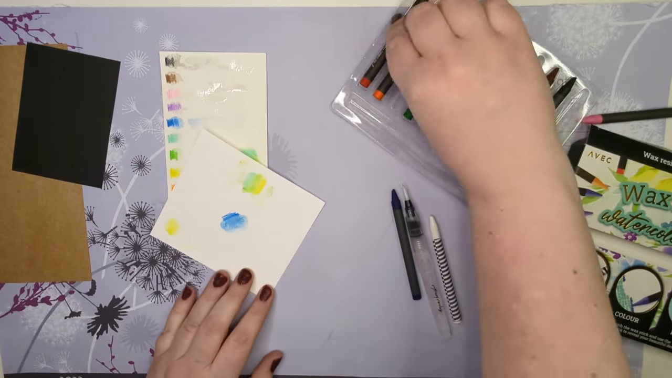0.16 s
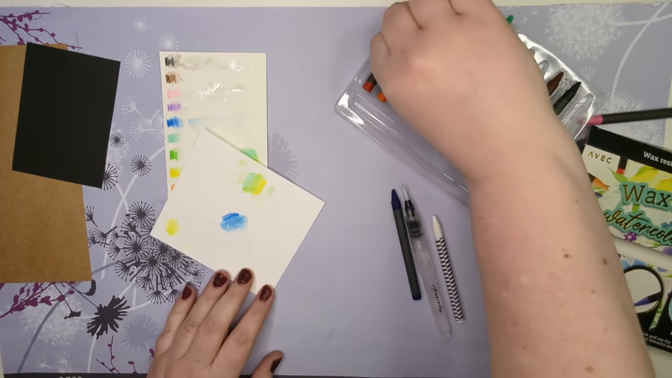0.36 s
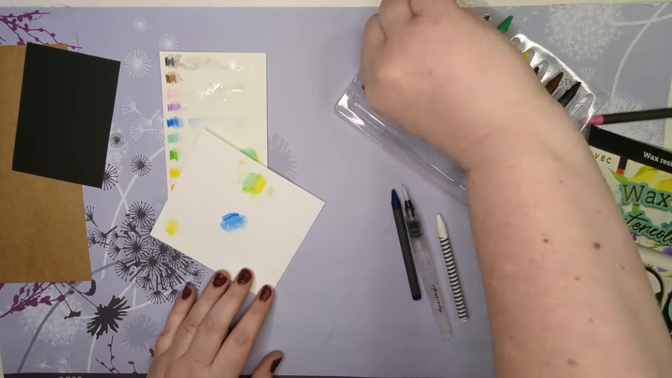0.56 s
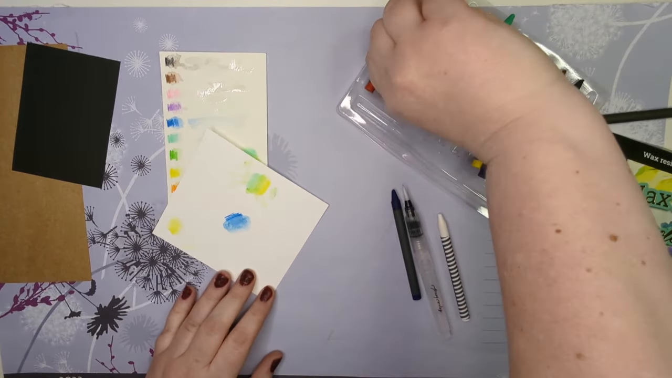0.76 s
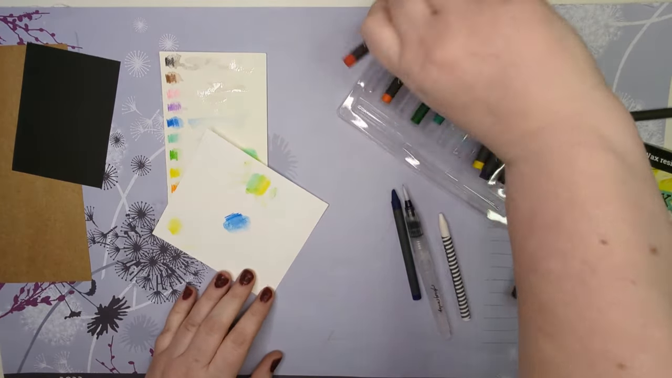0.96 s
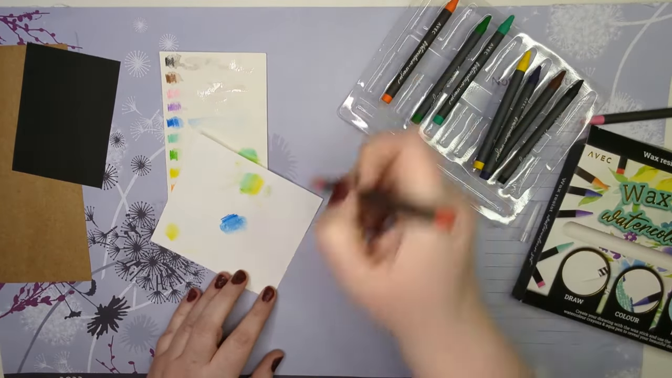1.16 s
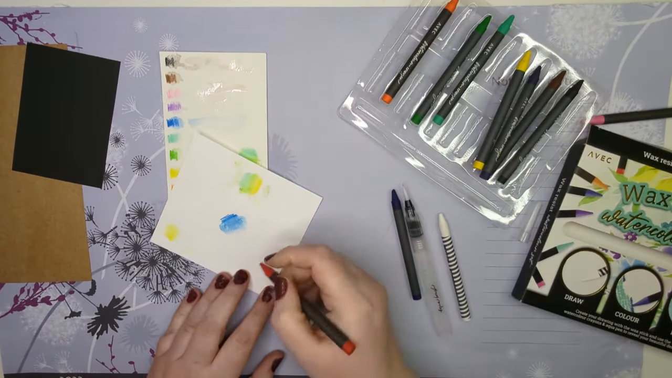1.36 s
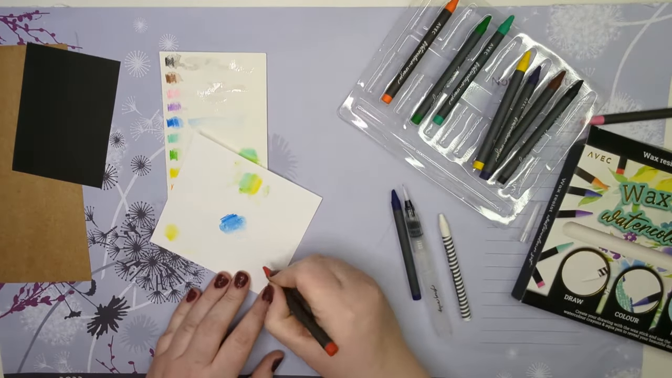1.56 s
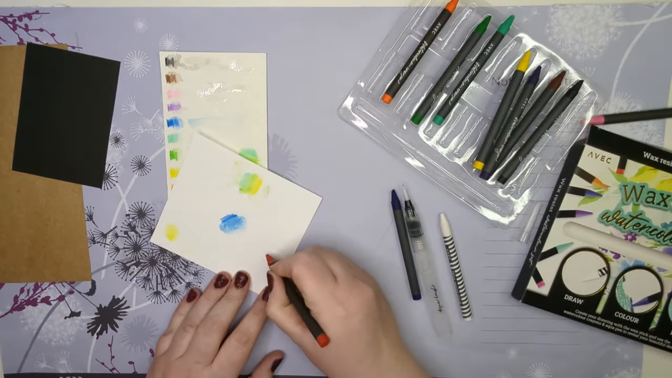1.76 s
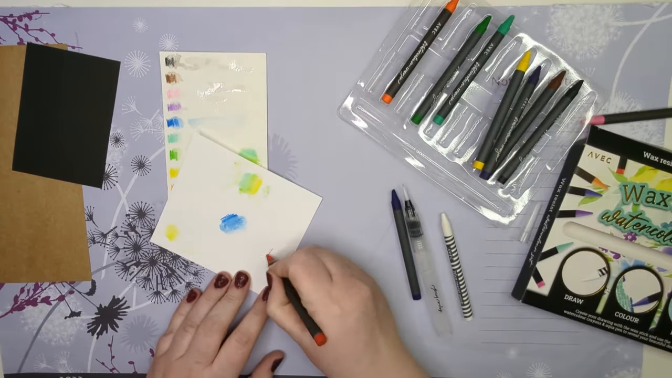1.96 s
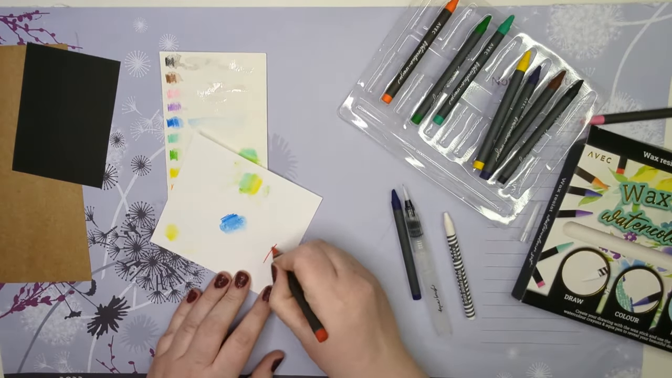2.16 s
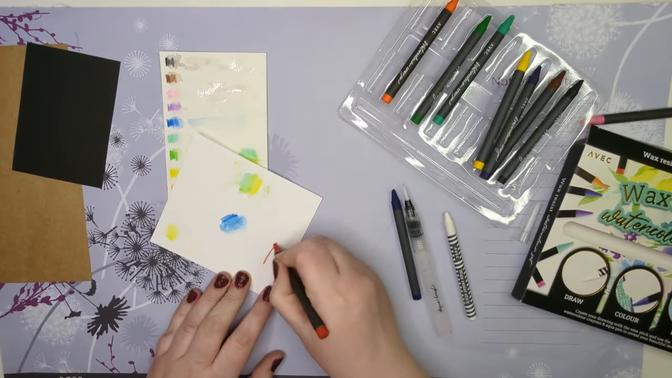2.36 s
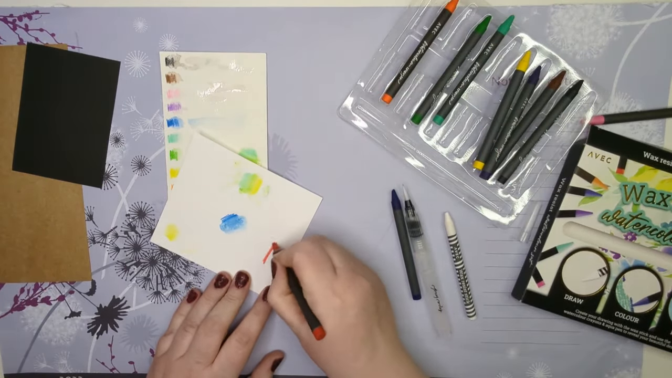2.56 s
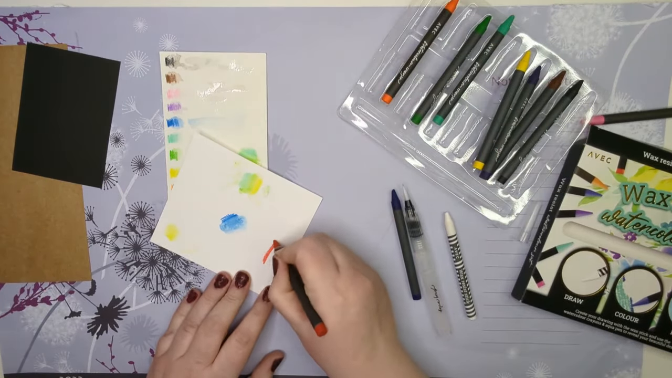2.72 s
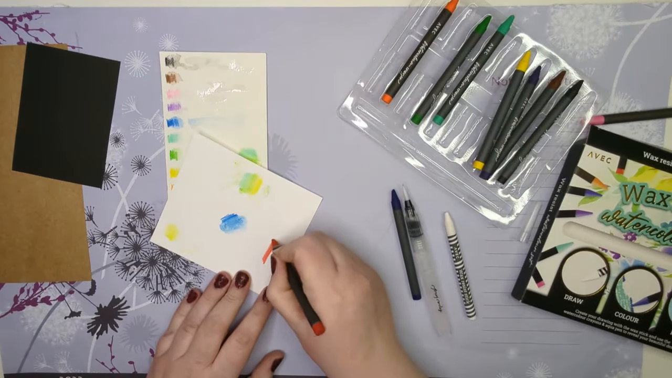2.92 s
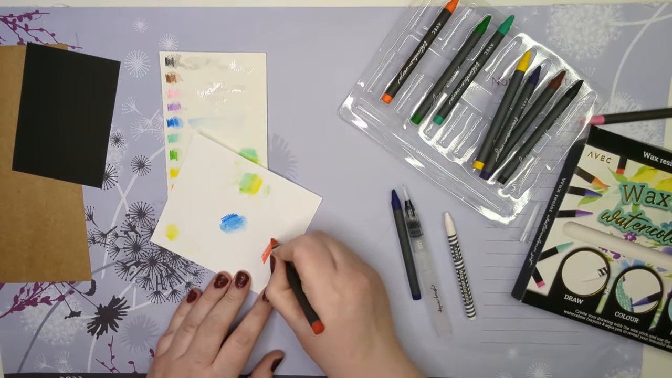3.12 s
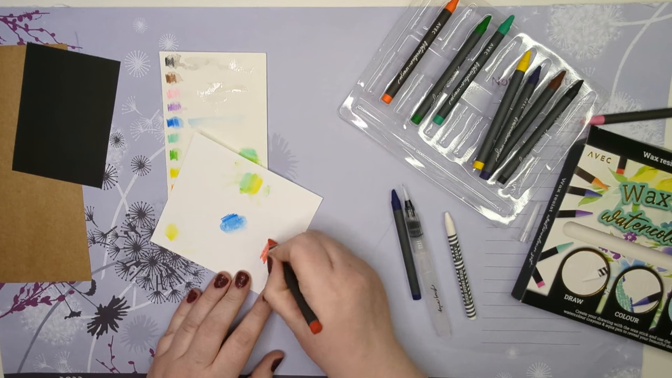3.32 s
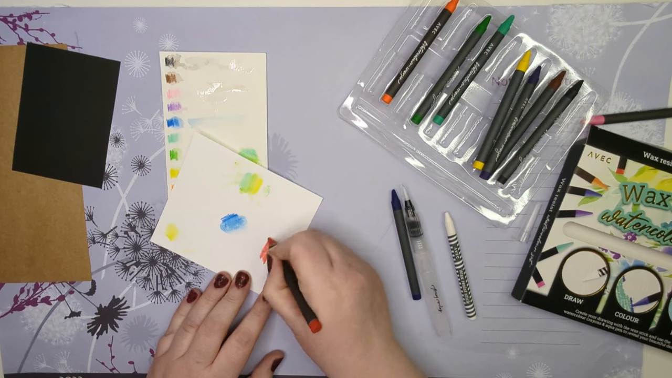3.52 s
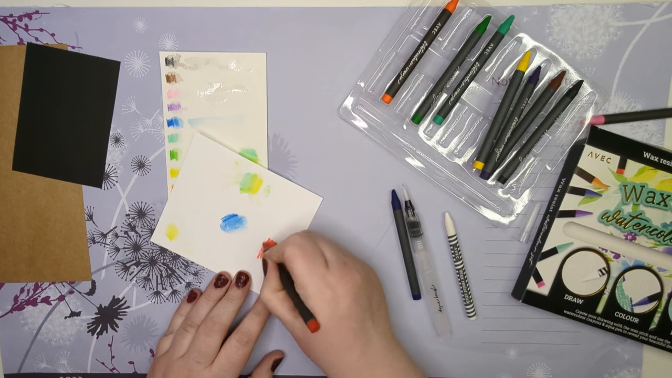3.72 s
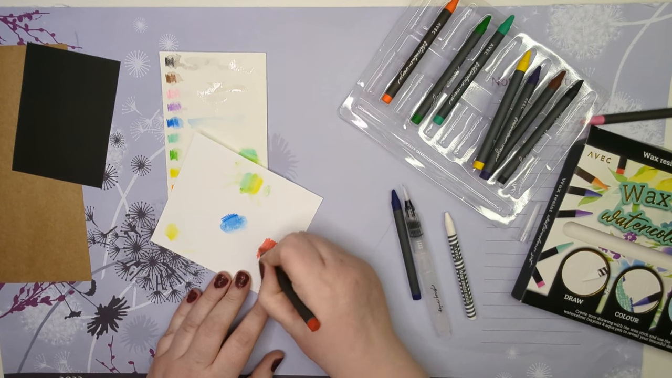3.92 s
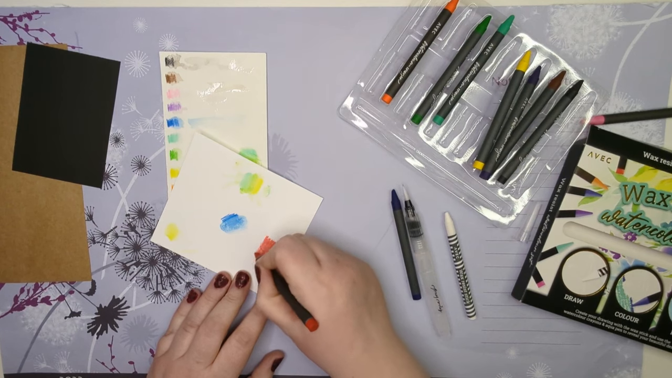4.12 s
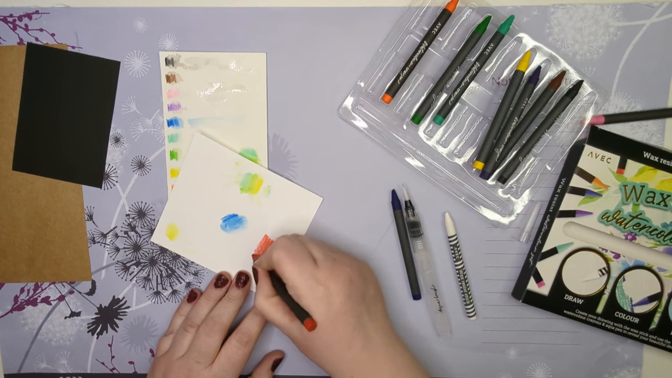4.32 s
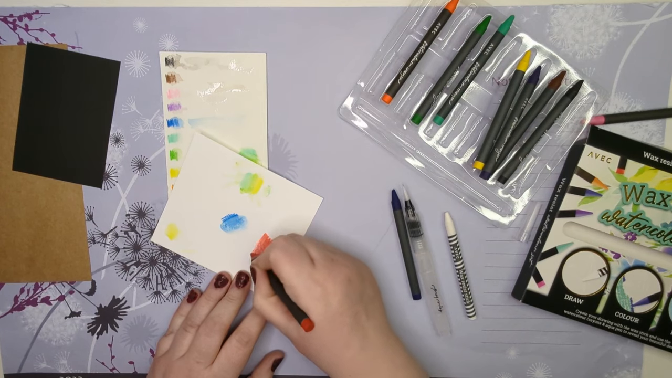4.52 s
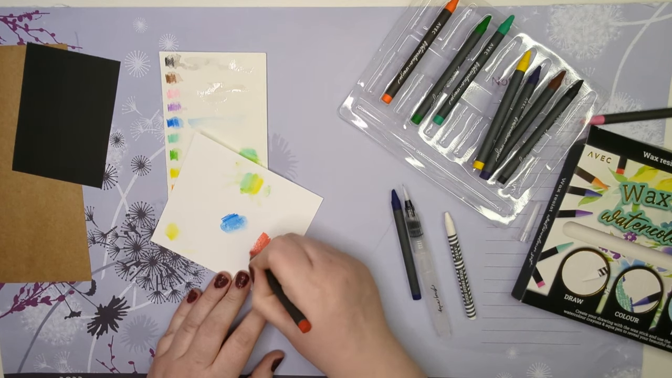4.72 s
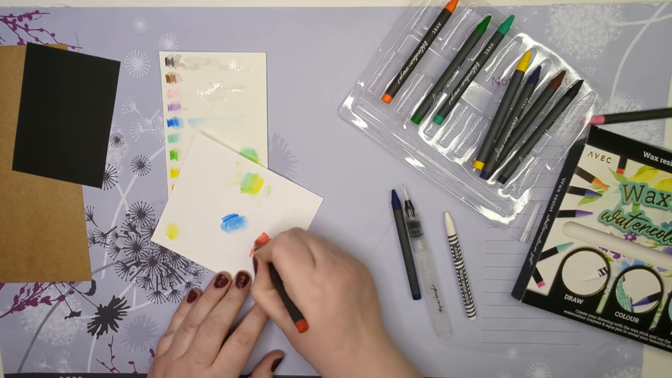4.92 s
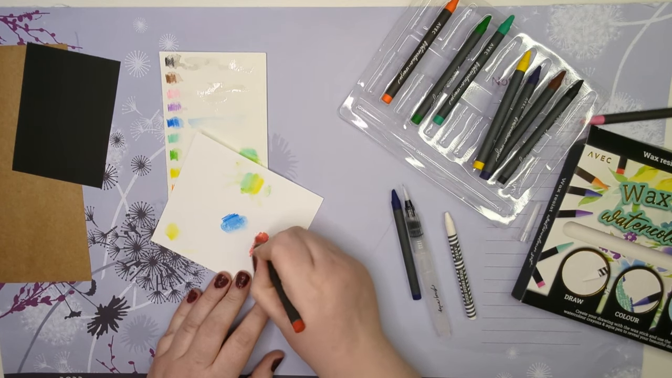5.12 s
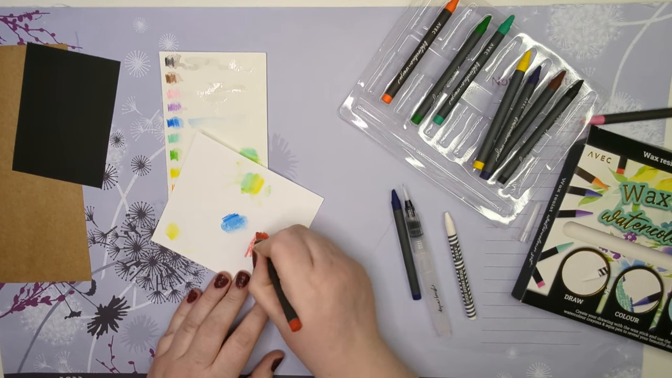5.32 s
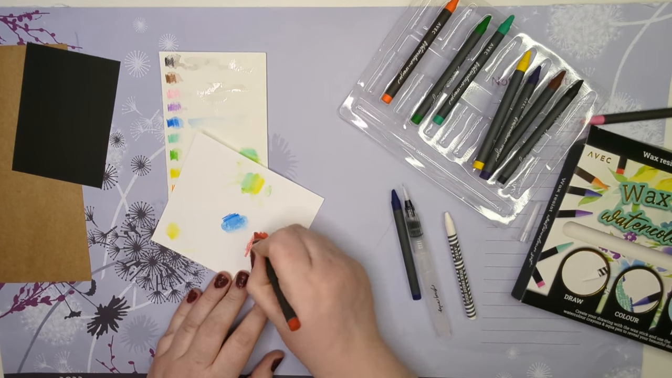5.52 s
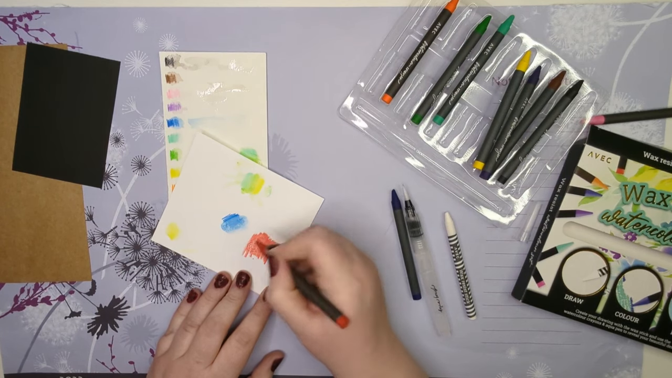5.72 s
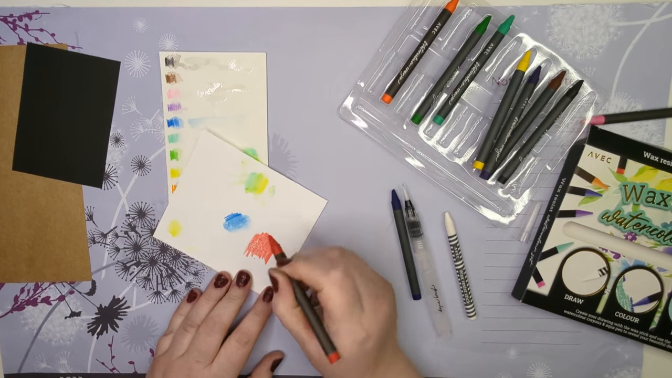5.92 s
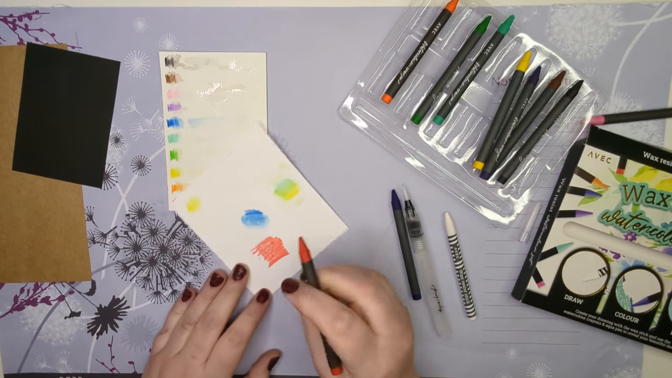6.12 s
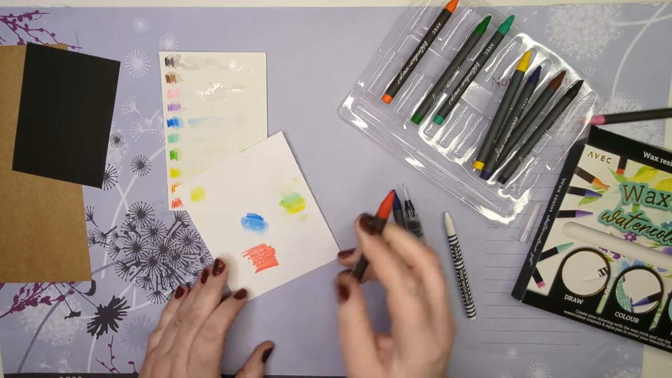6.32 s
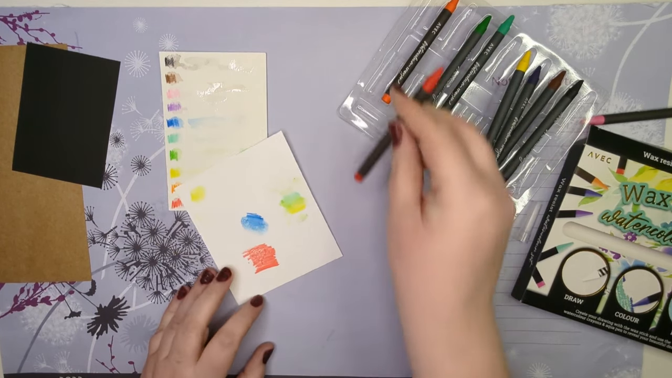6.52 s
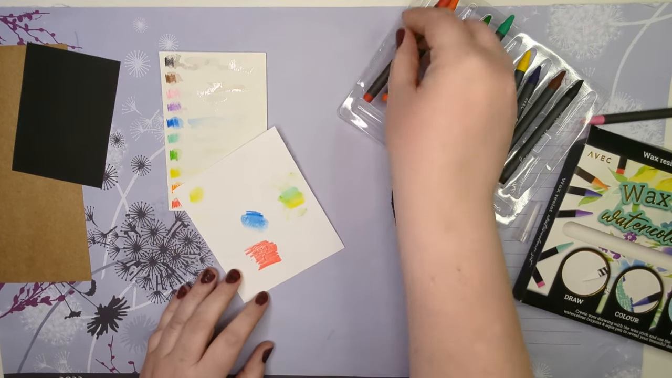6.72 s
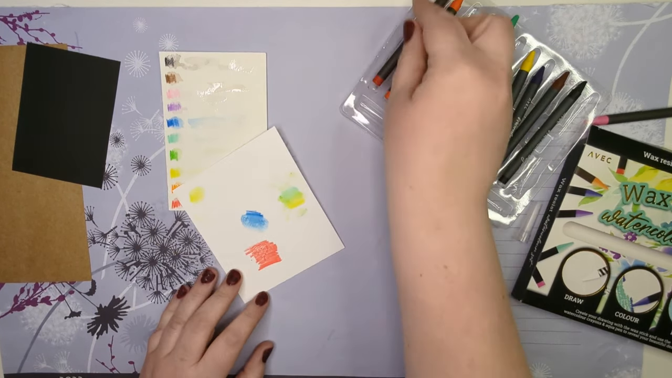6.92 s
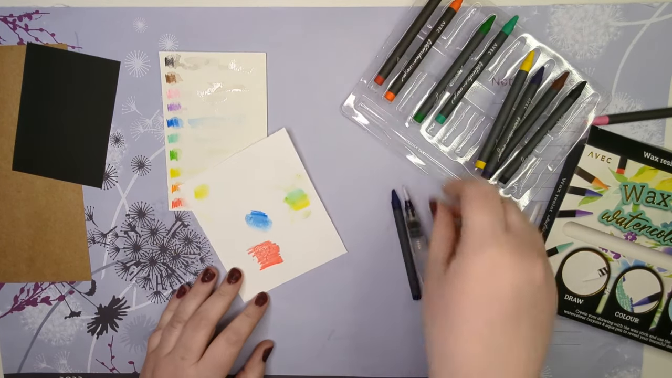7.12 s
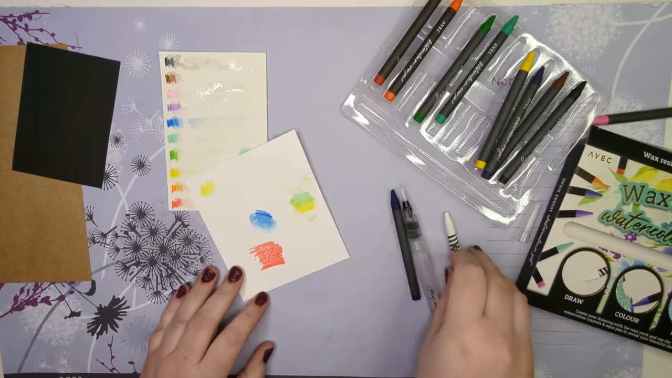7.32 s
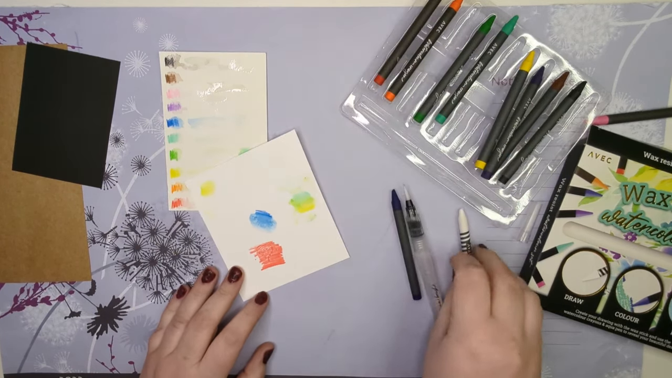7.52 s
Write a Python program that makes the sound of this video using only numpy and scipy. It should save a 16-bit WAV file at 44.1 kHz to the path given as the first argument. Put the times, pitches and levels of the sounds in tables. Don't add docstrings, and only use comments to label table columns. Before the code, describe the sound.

Close wide stereo microphones clamped to a table pick up brief hollow plastic rattles and scrapes, a light hand landing, then nearly four seconds of regular dry crayon hissing over rough paper, with low table murmur under the strokes. The scribbling stops, skin and paper brush smoothly, and a bright hard clatter marks the crayon dropped in its tray. Light handling thumps end it over quiet room hiss and low rocking.

```python
import sys
import numpy as np
from scipy import signal
from scipy.fft import rfft, irfft, next_fast_len
from scipy.io import wavfile

SR = 44100
rng = np.random.default_rng(int(sys.argv[2]) if len(sys.argv) > 2 else 0)


def put_to_file(sound):
    columns = np.atleast_2d(sound).T
    safe = np.clip(columns, -1, 1)
    whole_steps = np.round(safe * 32767)
    wavfile.write(sys.argv[1], SR, whole_steps.astype(np.int16))


def attenuation_scalar(level_db):
    decades = np.asarray(level_db, float) / 20
    return 10 ** decades


N = 338247

# frequency in Hz, level in dB per Hz.
AIR_SPECTRUM = [(30, -35), (59, -9), (157, -14.5), (311, -22.5), (889, -23.5), (1160, -17.5), (1860, -16.5),
                (3000, -21), (4780, -24.5), (7090, -24), (8300, -30), (9900, -39), (12000, -35.5),
                (16000, -39)]
# time in seconds, frequency in Hz.
WHINE_PITCH = [(0, 8913), (1.1, 8909), (1.3, 8923), (2.9, 8913), (3.4, 8922), (4.7, 8931), (5.9, 8924),
               (6.2, 8912), (7.67, 8915)]
# time in seconds, level in dB.
ARM_WEIGHT = [(0.0, -64), (0.21, -46.5), (0.45, -60), (0.49, -39.5), (0.64, -59.5), (1.39, -55.5),
              (1.43, -45.5), (1.69, -60.5), (2.37, -50.5), (2.84, -53.5), (5.21, -46), (5.68, -49.5),
              (5.75, -60), (6.6, -59), (7.03, -44), (7.28, -66), (7.33, -51), (7.67, -61)]
# frequency in Hz, width in Hz, level in dB.
FRAME_MODES = [(54.8, 12.9, 4), (117.2, 14.2, -2), (86, 78, -15), (37.7, 17, -5.5)]
# frequency in Hz, width in Hz, level in dB.
TABLE_MODES = [(216.6, 36, 3), (278, 27.6, 1), (160, 25, -1), (305, 115, -10), (566, 95, -14)]
# start in seconds, top level in dB, frame level in dB, 60 dB decay in seconds.
TABLE_THUMPS = [(0.47, -64, -52, 0.13), (3.14, -70, -49, 0.072), (5.64, -64, -49, .12),
                (1.392, -50.5, -48, 0.12), (1.47, -58.5, -56, 0.14), (1.54, -69, -50, .12),
                (6.545, -70, -55, .1), (6.787, -42.5, -53, 0.15), (6.9, -53, -58, 0.14),
                (6.966, -58, -56, 0.097), (7.01, -42, -42, 0.14), (7.05, -53, -48, 0.2),
                (7.333, -58, -49, 0.087), (7.44, -50, -61, 0.24), (7.584, -68, -50, .1)]
# loudest moment in seconds, rise in seconds, fall in seconds,
# body level in dB, edge over body in dB.
SKIN_RUBS = [(1.2, 0.2, 0.22, -66, 5.5), (1.235, 0.063, 0.034, -55, 10.5),
             (1.285, 0.048, 0.024, -60.5, 14.5), (1.403, 0.017, 0.027, -45, -8.5),
             (1.455, 0.018, 0.012, -51, -7), (1.49, 0.091, 0.096, -63.5, 4), (1.6, 0.21, 0.11, -61.5, 0),
             (5.84, 0.08, 0.066, -57.5, 3.5), (6.1, 0.19, 0.1, -54, 0.5), (6.2, 0.11, .1, -51, 3),
             (6.305, 0.094, 0.064, -55.5, 9.5), (6.465, 0.09, 0.051, -58.5, 7), (7.33, 0.057, .04, -62, -4),
             (7.43, 0.032, 0.043, -48, -2.5)]
# frequency in Hz, level in dB per Hz.
RUB_SPECTRUM = [(180, -11), (300, -14.5), (430, -6.5), (725, -15), (1300, -4.5), (2170, -3), (2930, -11.5),
                (5500, -10), (6700, -6), (8300, -8), (9900, -10), (13000, 6.5), (16000, 3.5)]
# loudest moment in seconds, rise in seconds, body level in dB,
# edge over body in dB.
TRAY_DRAGS = [(0.208, 0.034, -32, -2.5), (.245, 0.025, -42, -2), (0.304, 0.034, -37, -3.5),
              (0.427, 0.046, -36.5, -7.5), (0.525, 0.0072, -35.5, -3.5), (.546, 0.008, -44, -11),
              (0.572, .005, -42.5, -14), (0.707, 0.012, -42, -9), (.74, 0.0093, -33, -4),
              (.755, 0.008, -42, -7), (.77, 0.015, -44.5, -5), (.815, 0.033, -38, -4),
              (0.859, 0.029, -40.5, -5.5), (0.945, 0.031, -40, -7.5), (6.794, 0.006, -39, -10),
              (6.815, 0.015, -51, 0), (6.859, 0.013, -40.5, -13), (6.893, 0.021, -39.5, 0),
              (6.915, 0.025, -34.5, -4), (6.972, 0.008, -39, 4), (7.02, 0.016, -30.5, -7),
              (7.045, 0.02, -34, -6.5), (7.08, 0.028, -51, -4), (.272, .02, -50, -3), (.375, .04, -53, -7),
              (.62, .06, -54.5, -13), (.897, 0.01, -46, -8), (6.948, 0.011, -53, -4),
              (6.993, 0.014, -41.5, -6)]
# frequency in Hz, width in Hz, level in dB.
TRAY_MODES = [(1100, 220, 0), (1560, 200, -3), (2230, 300, -1), (2600, 250, -4), (3650, 300, -4),
              (5180, 500, -14), (6500, 800, -9)]
# frequency in Hz, level in dB per Hz.
TRAY_SPECTRUM = [(180, -41), (300, -18.5), (645, -2.5), (787, -7.5), (1100, 3), (1460, 1), (2250, -4.5),
                 (2930, -10), (6620, -13.5), (16000, -23)]
# start in seconds, peak in dB, main ring in Hz, edge over peak in dB,
# sheen over peak in dB.
CRAYON_KNOCKS = [(0.18, -21.5, 1660, -19, -28), (0.203, -22, 1130, -15, -27), (0.453, -25, 2150, -22, -30),
                 (0.507, -17.5, 975, -10.5, -34), (0.522, -15, 970, -16, -18),
                 (0.566, -23.5, 1250, -21, -30), (0.686, -32.5, 1680, -4, -30),
                 (0.704, -28.5, 1000, -14, -30), (0.723, -18.5, 1260, -18, -30),
                 (0.735, -18.5, 1010, -11.5, -27), (0.767, -29, 2590, -9, -31), (0.92, -20, 1340, -24, -29),
                 (1.39, -32.5, 1730, -9, -27), (1.447, -34, 1800, -21, -23), (6.787, -6.5, 1880, -11, -37),
                 (6.853, -24, 1550, -12.5, -25), (6.912, -16.5, 1350, -11, -11),
                 (6.963, -11, 1680, -6, -23), (6.973, -24, 1670, -2, 2.5), (7.002, -30, 1800, -7, -16),
                 (7.008, -9, 2020, 1, -33), (7.013, -8, 1550, -14, -29), (7.047, -17.5, 1660, -3, -18)]
# frequency in Hz, level in dB.
KNOCK_RINGS = [(650, -19), (950, -10), (1250, -16), (1600, -2.5), (1950, 0), (2300, 1), (2650, -0.5),
               (3500, 1.5), (4000, -1), (4600, -0.5), (5200, -2), (6300, 2.5), (6800, -2), (8200, 2.5),
               (10500, -22), (12000, -4.5), (13500, -1), (15000, -4)]
# middle of the way out in seconds, middle of the way back in seconds,
# scratch level in dB, table hum on the way out in dB, table hum on the way back in dB.
CRAYON_STROKES = [(2.04, 2.139, -53, -51, -50), (2.26, 2.356, -48, -52.5, -51.5),
                  (2.465, 2.554, -48, -54.5, -62.5), (2.662, 2.751, -50.5, -51, -64),
                  (2.867, 2.957, -49, -55, -63), (3.074, 3.16, -48.5, -55.5, -59),
                  (3.277, 3.364, -48, -52, -62), (3.487, 3.57, -49, -55, -62.5),
                  (3.694, 3.787, -46.5, -55, -57.5), (3.92, 4.012, -46.5, -50.5, -57),
                  (4.135, 4.232, -46.5, -49, -53.5), (4.36, 4.448, -46, -45, -51),
                  (4.573, 4.669, -46, -48.5, -57), (4.789, 4.889, -44.5, -40.5, -45),
                  (5.017, 5.11, -47.5, -44.5, -45.5), (5.227, 5.32, -43.5, -39, -51),
                  (5.456, 5.539, -48.5, -46.5, -57)]
# frequency in Hz, level in dB per Hz.
SCRATCH_SPECTRUM = [(210, -25), (350, -12.5), (575, -4.5), (742, -8), (2170, 2.5), (2940, -5), (4000, -2.5),
                    (5600, -3), (6600, -2), (8300, -4.5), (9900, -11), (11600, -1.5), (13500, -3),
                    (16000, -5)]
# time in seconds, sheen over scratch in dB.
WAX_SHEEN = [(2.0, -10), (2.7, -12), (3.3, -6.5), (4.5, -5), (4.85, -5.5), (5.05, -8), (5.7, -10)]

BODY_TOP_HZ, EDGE_TOP_HZ = 3000, 9200


def rms_one(x):
    return x / np.sqrt(np.mean(x ** 2) + 1e-20)


def filtered(x, order, hz, kind):
    return signal.sosfilt(signal.butter(order, hz, kind, fs=SR, output="sos"), x)


def in_time(curve):
    s, value = np.transpose(curve)
    return np.interp(np.arange(N) / SR, s, value)


def coloured(x, spectrum):
    size = next_fast_len(N)
    hz, db = np.transpose(spectrum)
    bins_hz = np.arange(size // 2 + 1) * SR / size
    gain = attenuation_scalar(np.interp(np.log(bins_hz + 1), np.log(hz), db))
    return rms_one(irfft(rfft(x, size) * gain, size)[..., :N])


def three_bands(x):
    body = filtered(x, 4, BODY_TOP_HZ, "low")
    edge = filtered(x, 4, [BODY_TOP_HZ, EDGE_TOP_HZ], "band")
    sheen = filtered(x, 4, EDGE_TOP_HZ, "high")
    return rms_one(body), rms_one(edge), rms_one(sheen)


def drift(rate_hz):
    r = np.exp(-40 * np.pi * rate_hz / SR)
    noise = rng.standard_normal(N // 20 + 4002)
    slow = signal.lfilter([1], [1, -2 * r, r * r], noise)[4000:]
    return np.interp(np.arange(N) / 20, np.arange(len(slow)), rms_one(slow))


def grains(per_s, spread_db, clump_db, channels):
    luck = rng.uniform(-1, 1, (channels, N)) * SR / per_s
    size_db = spread_db * np.clip(-np.log(np.abs(luck) + 1e-9), 0, 3)
    catches = np.sign(luck) * attenuation_scalar(size_db) * (np.abs(luck) < 1)
    return catches * attenuation_scalar(clump_db * np.clip(drift(45), -2, 1.5))


def resonances(x, modes):
    out = 0
    for k, (hz, width_hz, db) in enumerate(modes):
        r = np.exp(-np.pi * width_hz / SR)
        zeros = [(1 - r * r) / 2, 0, (r * r - 1) / 2]
        poles = [1, -2 * r * np.cos(2 * np.pi * hz / SR), r * r]
        out = out + (-1) ** k * attenuation_scalar(db) * signal.lfilter(zeros, poles, x)
    return out


def ring(hz, t60):
    t = np.arange(round(t60 * SR)) / SR
    return np.sin(2 * np.pi * hz * t) * attenuation_scalar(-60 * t / t60)


def add(track, s, sound):
    i = round(s * SR)
    track[..., i:i + len(sound)] += sound[:N - i]


def swells(times, peaks_db, sharp):
    out = np.zeros(N)
    for (s, rise, fall), db in zip(times, peaks_db):
        speeding = np.linspace(0, .5, round(rise * SR))
        slowing = np.linspace(.5, 1, round(fall * SR))
        turn = np.concatenate([speeding, slowing])
        add(out, s - rise, attenuation_scalar(db) * np.abs(np.sin(np.pi * turn)) ** sharp)
    return out


def sliding(times, db, edge_db, sheen_db, texture, sharp):
    body, edge, sheen = three_bands(texture)
    out = swells(times, db, sharp) * body
    out = out + swells(times, db + edge_db, sharp + 0.12) * edge
    return out + swells(times, db + sheen_db, sharp + 0.3) * sheen


def spread_out(texture, lag, alike_hz, shared_db):
    shared, *own = texture
    bass = filtered(shared, 2, alike_hz, "low")
    treble = filtered(attenuation_scalar(shared_db) * shared + np.array(own), 2, alike_hz, "high")
    left, right = bass + treble / np.sqrt(1 + attenuation_scalar(2 * shared_db))
    return np.array([left, np.roll(right, lag)])


def room():
    air = spread_out(rng.standard_normal((3, N)), lag=0, alike_hz=100, shared_db=-21)
    hiss = attenuation_scalar(-52.5) * coloured(air, AIR_SPECTRUM)
    waver_hz = 7 * drift(18)
    turn = 2 * np.pi * np.cumsum(in_time(WHINE_PITCH) + waver_hz) / SR
    whine_db = np.array([[-71], [-55]]) + 0.93 * drift(23)
    whine = np.sqrt(2) * np.sin(turn + [[.6], [0]]) * attenuation_scalar(whine_db)
    return hiss + whine


def rocking():
    late_s, half_s = 0.005, 0.055
    tugs = [(back_s + late_s, half_s, half_s) for _, back_s, *_ in CRAYON_STROKES]
    return in_time(ARM_WEIGHT) + 5.5 * (swells(tugs, np.zeros(len(tugs)), 1.8) - 0.3)


def frame():
    shared, *own = rng.standard_normal((3, N))
    shaken = resonances(shared + 0.27 * np.array(own), FRAME_MODES)
    shaken = resonances(shaken, [(66, 200, 0)])
    return attenuation_scalar(rocking()) * rms_one(shaken)


def table_hum():
    shared, *own = grains(1400, 1.3, 0.75, channels=3)
    return rms_one(resonances(shared + 0.14 * np.array(own), TABLE_MODES)) * attenuation_scalar([[-.8], [.8]])


def thumps():
    out = np.zeros(N)
    for s, top_db, frame_db, t60 in TABLE_THUMPS:
        for modes, db in (TABLE_MODES, top_db), (FRAME_MODES[:2], frame_db):
            for hz, _, mode_db in modes:
                add(out, s, attenuation_scalar(db + mode_db) * ring(hz, t60))
    return out


def rubs():
    skin = spread_out(grains(20000, 2.0, 0.86, channels=3), lag=4, alike_hz=470, shared_db=-13.0)
    rows = np.array(SKIN_RUBS)
    db, edge_db = rows[:, 3:].T
    sheen_db = -7.5 + 1.67 * edge_db
    return attenuation_scalar(2.5) * sliding(rows[:, :3], db, edge_db, sheen_db, coloured(skin, RUB_SPECTRUM), 2.3)


def drags(hum):
    rough = spread_out(grains(2200, 4.1, 1.67, channels=3), lag=8, alike_hz=1230, shared_db=-7.0)
    modes = sum(attenuation_scalar(4.3 * drift(4.5)) * resonances(rough, [mode]) for mode in TRAY_MODES)
    texture = coloured(rough, TRAY_SPECTRUM) + 0.61 * rms_one(modes)
    s, rise, db, edge_db = np.transpose(TRAY_DRAGS)
    fall = 0.011 + 1.08 * rise
    times = np.transpose([s, rise, fall])
    scrape = sliding(times, db, edge_db, -12 + 1.2 * edge_db, texture, 1.66)
    return attenuation_scalar([[2.5], [1.5]]) * scrape + swells(times, db - 24, 0.73) * hum


def knocks():
    out = np.zeros((2, N))
    luck = rng.standard_normal((len(CRAYON_KNOCKS), len(KNOCK_RINGS), 4))
    bounces = rng.random((len(CRAYON_KNOCKS), 3))
    for (s, db, main_hz, edge_db, sheen_db), draws, bounce in zip(CRAYON_KNOCKS, luck, bounces):
        delays_s = np.cumsum(.0008 + .0014 * bounce)
        touches = [(0, 0), *zip(delays_s, (-6, -8, -12))]    # (delay s, dB)
        for (hz, mode_db), (left, right, tune, late) in zip(KNOCK_RINGS, draws):
            body_db = -12 * min(abs(np.log2(hz / main_hz)), 1.3)
            bands_db = (body_db, edge_db + 1.0, sheen_db + 10.5)
            band_db = bands_db[np.searchsorted((BODY_TOP_HZ, EDGE_TOP_HZ), hz)]
            t60 = 0.032 * (1500 / hz) ** 1.09
            sound = attenuation_scalar(db + mode_db + band_db - 7.0) * ring(hz * (1 + 0.018 * tune), t60)
            sides = attenuation_scalar([1.3 + 1.5 * left, -1.3 + 1.5 * right])
            for delay, touch_db in touches:
                start = s + .0006 + .0004 * abs(late) + delay
                add(out[0], start, attenuation_scalar(touch_db) * sides[0] * sound)
                add(out[1], start + 8 / SR, attenuation_scalar(touch_db) * sides[1] * sound)
    return out


def tray(hum):
    return drags(hum) + filtered(knocks(), 2, 450, "high")


def strokes():
    out_s, back_s, db, out_hum_db, back_hum_db = np.transpose(CRAYON_STROKES)
    last_s, last_db, last_hum_db = 5.662, -45, -44.5
    s = np.r_[out_s, last_s, back_s]
    back = np.arange(len(s)) > len(db)
    length_s = np.where(back, 0.11, 0.088)
    back_db = -48.5 + 0.47 * (db - db.mean())
    scratch_db = np.r_[db, last_db, back_db]
    sheen_db = np.interp(s, *np.transpose(WAX_SHEEN)) + 2.2 * back
    hum_db = np.r_[out_hum_db, last_hum_db, back_hum_db]
    return np.transpose([s, 0.48 * length_s, 0.51 * length_s]), scratch_db, sheen_db, hum_db


def scribble(hum):
    times, db, sheen_db, hum_db = strokes()
    tooth = spread_out(grains(14000, 4.4, 1.9, channels=3), lag=1, alike_hz=530, shared_db=-5.5)
    body, edge, sheen = three_bands(coloured(tooth, SCRATCH_SPECTRUM))
    patchy = attenuation_scalar(-5.0 + 1.04 * drift(22)) * body + attenuation_scalar(-5.0 + 0.61 * drift(28)) * edge
    scratch = swells(times, db, 0.98) * patchy + swells(times, db + sheen_db - 0.5, 1.1) * sheen
    return attenuation_scalar(3.0) * scratch * attenuation_scalar([[-.7], [.7]]) + swells(times, hum_db, 1.44) * hum


def in_room(x, room_db):
    t = np.arange(round(.3 * SR)) / SR
    tail = filtered(rng.standard_normal((2, len(t))), 1, [300, 6000], "band")
    tail = tail * attenuation_scalar(room_db - 60 * t / 0.22) * (t > .003)
    return x + signal.fftconvolve(x, tail, axes=1)[:, :N]


def scene():
    hum = table_hum()
    close = rubs() + thumps() + tray(hum) + scribble(hum)
    return room() + frame() + in_room(close, -37.5)


def roll_off(x):
    return signal.sosfilt(signal.butter(12, 16520, fs=SR, output="sos"), x)


def record(dry):
    cut = signal.sosfilt(signal.cheby2(18, 45, 15940, fs=SR, output="sos"), dry)
    cut = filtered(cut, 4, 38, "high")
    return roll_off(np.clip(cut, -1, 1))


dry = scene()
out = record(dry)
put_to_file(out)
```